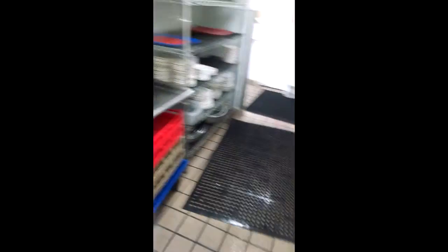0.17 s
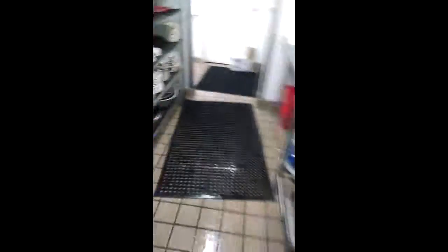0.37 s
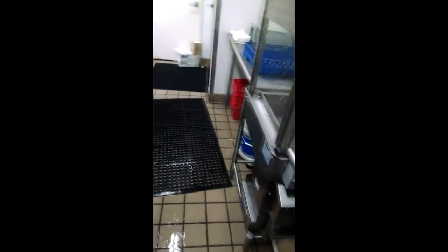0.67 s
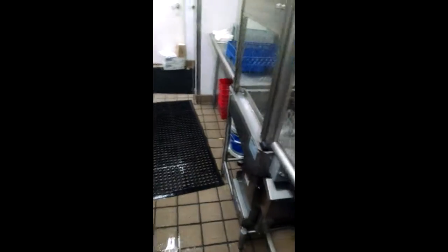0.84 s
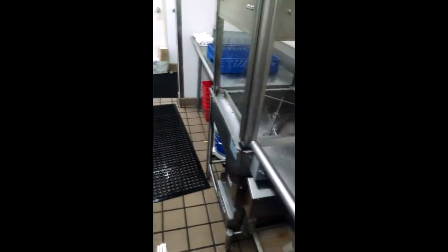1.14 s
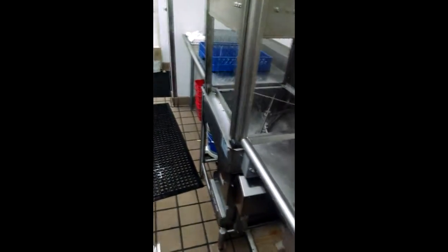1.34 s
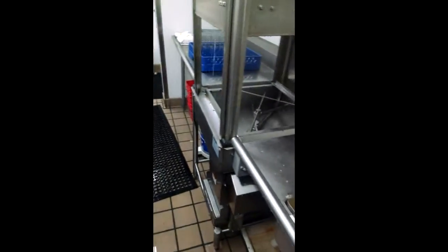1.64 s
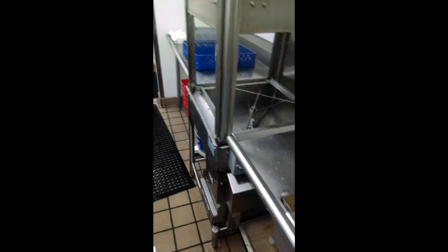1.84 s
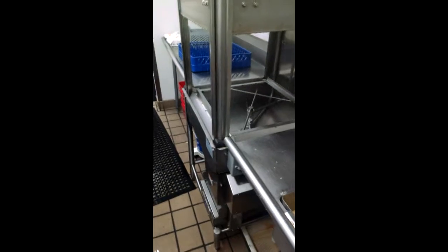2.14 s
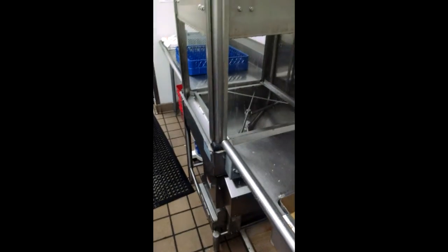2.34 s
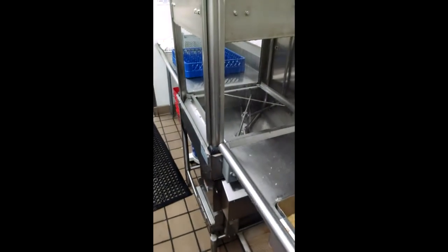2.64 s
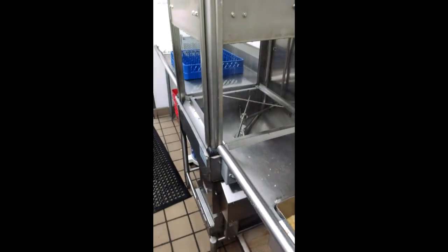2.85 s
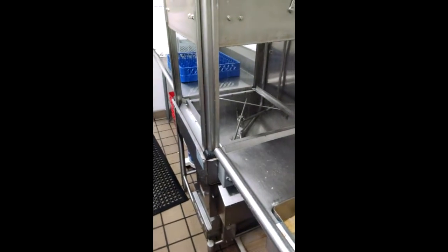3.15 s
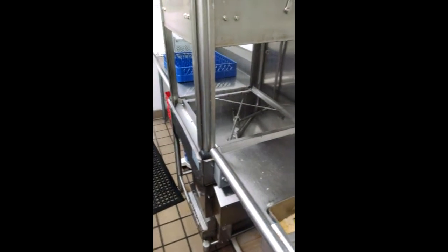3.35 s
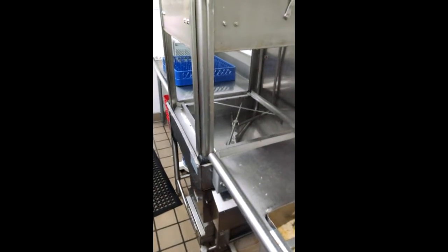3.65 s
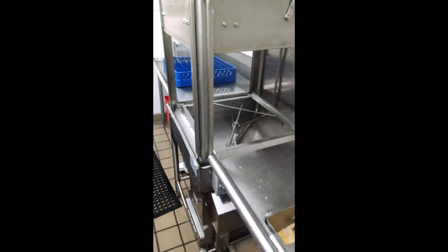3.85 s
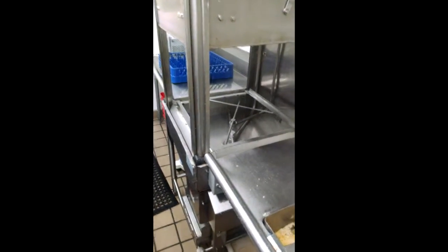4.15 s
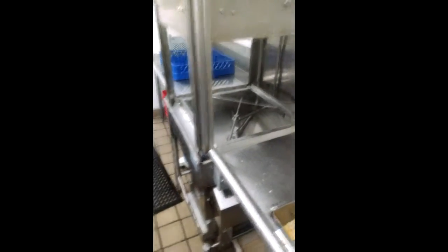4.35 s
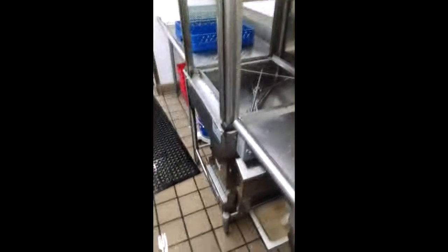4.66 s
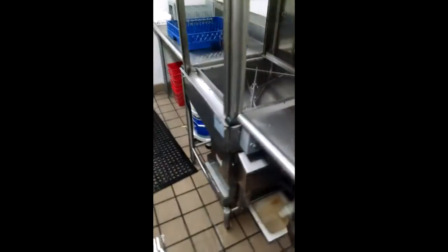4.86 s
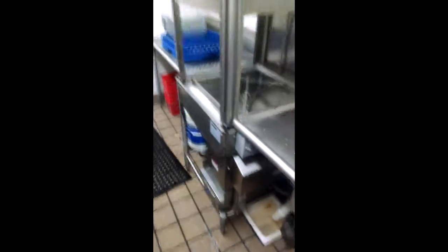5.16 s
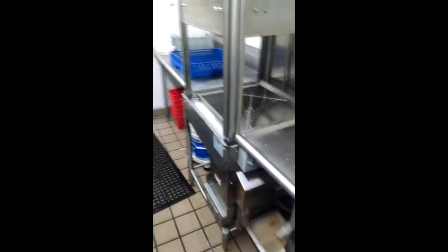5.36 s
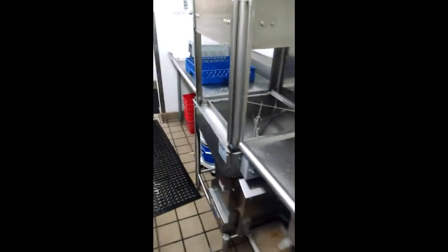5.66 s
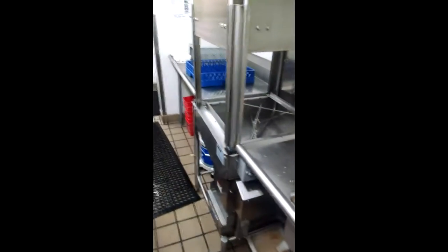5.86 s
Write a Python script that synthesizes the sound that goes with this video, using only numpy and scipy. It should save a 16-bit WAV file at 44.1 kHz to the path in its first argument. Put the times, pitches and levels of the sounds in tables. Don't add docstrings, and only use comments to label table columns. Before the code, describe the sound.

Low motor hum and rumbling water churn run continuously inside steel panels, with dull splashing and fine high hiss on top. The hiss is strongest at the start; the pump grows nearer over two seconds, then stays level. Irregular crisp slaps, drips and crackling ticks hit metal, thinning after halfway. A few knocks ring briefly. Close handheld stereo phone pickup, short tiled-room reflections.

```python
import sys
import numpy as np
from scipy import signal
from scipy.fft import rfft, irfft
from scipy.io import wavfile
from scipy.ndimage import uniform_filter1d

SR = 44100
rng = np.random.default_rng(int(sys.argv[2]) if len(sys.argv) > 2 else 0)


def store_wav(level_fs):
    pcm = np.round(np.clip(np.atleast_2d(level_fs), -1, 1) * 32767)
    wavfile.write(sys.argv[1], SR, pcm.T.astype(np.int16))


def convert_level_to_amplitude(level_db):
    exponent = np.asarray(level_db, float) / 20
    return 10 ** exponent


N = 265261
HZ = np.fft.rfftfreq(N, 1 / SR)

# time_s, tank_level_db, spray_level_db, extra_wall_path_m
PHONE_PATH = [(0.0, -40.5, -31.5, 0.56), (0.28, -40.5, -35, 0.086), (0.56, -37, -34, 0.35),
              (0.7, -36.5, -30, 0.19), (1.0, -33, -34, .3), (1.2, -31, -39.5, 0.18),
              (1.6, -33.5, -43.5, -0.017), (1.7, -33, -39.5, -0.093), (2.14, -27.5, -39.5, -0.1),
              (2.88, -27, -38, 0.26), (3.13, -28, -38.5, -0.06), (3.78, -28.5, -41, -0.19),
              (3.87, -27.5, -46, -0.065), (4.12, -28.5, -42.5, -0.14), (4.7, -28, -44, 0.033),
              (5.25, -28, -41, 0.32), (5.6, -28, -42, 0.32), (6.01, -28, -48.5, 0.39)]
# pitch_hz, level_db (re churn), wander_rate_per_s, wander_db
HUM_LINES = [(79.6, -8, 8.3, -0.5), (119.4, -11.5, 4, 4), (172, -11, 6, 2), (408, -14.5, 9, 3.5),
             (1096, -24.5, 8, 4), (1332, -31, 8, 3.5), (1484, -39, 13, 1)]
# pitch_hz, level_db (re tank), wall_path_turns, upper_port_lead_turns, step_back_gain_db
IMPELLER_TONES = [(234.5, -6, 0.035, 0.33, 2), (350.8, -9.5, 0.1, -0.07, -3), (666.4, -20.5, 0.42, 0.17, 5),
                  (543, -18.5, 0.33, 0.039, -1), (819, -24, 0.18, 0.16, -2)]
STEP_BACK_S, STEP_TAKES_S = 4.9, 0.17
WALL_SHARE = .5
TONE_DB_PER_TANK_DB = 0.14
# freq_hz, density_db (per Hz)
CHURN_SPECTRUM = [(46, 5.5), (65, 3.5), (120, 7), (250, 2), (400, -0.5), (700, -3), (850, -6), (1050, -11),
                  (1400, -14)]
# freq_hz, density_db (per Hz)
PANEL_SPECTRUM = [(900, -12), (1300, -2.5), (1900, 0), (2100, -3), (2300, -11), (3000, -13), (3600, -17)]
PANEL_DB = -10
# freq_hz, density_db (per Hz)
SPLASH_SPECTRUM = [(1800, -8), (2500, -3), (2950, 0), (3400, -.5), (4200, -2), (5500, -3), (8000, -7),
                   (11000, -12)]
SPLASH_DB, SPLASH_DB_PER_JET_DB, SPLASH_DB_PER_TANK_DB = -46.5, 0.59, 0.27
# freq_hz, density_db (per Hz)
JET_SPECTRUM = [(4000, -23), (6500, -9), (8200, -8), (10500, -1), (12500, -2), (14500, 5.5), (15150, -4),
                (15700, 16)]

# start_s, peak_db, low_part_db (re peak)
RACK_SLAPS = [(0.2259, -14, -16.5), (0.309, -17.5, -12), (0.578, -24.5, -7.5), (0.654, -21, -8.5),
              (0.72, -33, -2), (0.826, -69, -36), (0.891, -21, -14), (1.007, -27, -0.5), (1.159, -19, -17),
              (1.243, -17.5, -26), (1.3718, -19.5, -19), (1.4242, -15.5, -13), (1.4394, -27, -31),
              (1.522, -22.5, -10.5), (1.8136, -22.5, -8.5), (2.165, -19, -18), (2.5236, -17.5, -10.5),
              (2.541, -25, -18), (2.66, -19, -29), (2.75, -19, -20), (2.8144, -18, -27), (2.838, -15, -20),
              (2.954, -17.5, -22), (3.144, -22, -47), (3.403, -20.5, -35), (3.705, -22, -27),
              (4.101, -23.5, -11.5), (4.371, -25, -63), (4.566, -25, -7), (5.104, -30, -25)]
SLAP_HZ, SLAP_S = 14200, 0.049
# start_s, peak_db, low_part_db (re peak)
HOOD_SHEETS = [
    (0.072, -28.5, -15.5),
    (1.9096, -19, -18),
    (2.345, -17.5, -17.5),
    (3.018, -18.5, -44),
    (3.269, -21.5, -17),
]
SHEET_HZ, SHEET_S = 11600, 0.046
# start_s, peak_db, low_part_db (re peak)
STEEL_DROPS = [(.1306, -25, -21), (.4579, -27, -8), (1.4295, -13, -18), (1.4395, -23, -22),
               (1.5978, -26, -23), (1.6367, -25.5, -19), (1.726, -23, -14), (1.935, -23, -15),
               (2.0108, -28, -21), (2.2328, -25, -15), (2.4274, -22, -16), (2.5202, -24, -10),
               (2.8055, -25, -20), (2.825, -25, -18), (2.8434, -26, -20), (2.9302, -24, -11),
               (3.2331, -31, -18), (3.6237, -27, -12), (4.0612, -31, -14), (4.2098, -42, -19),
               (4.5446, -25, -9.5), (4.5775, -35, -8), (5.1078, -27, -16), (5.4261, -30, -15),
               (5.5662, -35, -20)]
DROP_HZ, DROP_S = 13400, 0.019
# start_s, peak_db
DROPLET_TICKS = [(0.081, -16), (0.1304, -26), (0.2259, -25), (0.2404, -19), (0.2584, -18), (0.2624, -16),
                 (0.3137, -18), (0.3174, -22), (0.4344, -27), (0.4574, -20), (0.5774, -31), (0.726, -18),
                 (0.8234, -38), (0.8984, -25), (1.0394, -27), (1.1543, -26), (1.243, -13.5), (1.3718, -22),
                 (1.4242, -6), (1.4304, -17), (1.4334, -6), (1.4394, -13), (1.5054, -15), (1.5978, -28),
                 (1.6372, -25), (1.6576, -22), (1.8148, -10.5), (1.9096, -15), (1.9355, -12), (2.0108, -25),
                 (2.1695, -20), (2.2326, -25), (2.3456, -21), (2.427, -25), (2.5197, -14), (2.6574, -15),
                 (2.7501, -16), (2.8055, -24), (2.8115, -22), (2.8244, -20), (2.8434, -18), (2.9294, -22),
                 (2.9584, -25), (3.019, -21), (3.1517, -24), (3.2331, -28), (3.269, -21), (3.6237, -27),
                 (3.707, -20), (4.0612, -29), (4.2098, -31), (4.3704, -16), (4.5444, -35), (4.6927, -30),
                 (5.107, -22), (5.4261, -33), (5.5675, -33), (5.9943, -20)]
TICK_DB, TICK_S, TICK_LOW_HZ = -7.5, .0016, 8060
# start_s, peak_db, pitch_hz, width_hz, t60_s
FRAME_KNOCKS = [(0.869, -36, 1660, 400, 0.56), (1.0768, -38, 890, 695, 0.18), (1.0983, -34, 623, 600, 0.23),
                (1.124, -42, 1070, 696, 0.081), (1.35, -38, 1690, 200, 0.28),
                (3.398, -28, 4580, 1400, 0.18), (3.408, -45, 3700, 900, 0.22),
                (3.695, -29.5, 1560, 350, 0.14), (4.578, -33.5, 7600, 2170, 0.3),
                (4.379, -39, 9500, 2500, 0.18), (4.719, -42, 10400, 2500, 0.2),
                (5.93, -32.5, 1730, 497, 0.28)]
STRIKE_DB = 1
# pitch_hz, level_db, t60_s
RACK_MODES = [(409, -7, .1), (560, -6, 0.077), (657, 0, 0.07), (877, 1, 0.065), (1040, -2, 0.084),
              (1170, -1, 0.055), (1810, -13, 0.13)]
# start_s, level_db
RACK_HITS = [
    (1.0765, -27),
    (1.0985, -34),
    (1.121, -35),
]
# pitch_hz, level_db, t60_s
RAIL_MODES = [(3849, -19, .15), (4230, -7, 0.035), (4307, -9, 0.14), (4650, -7, .08), (4560, -2.5, .35),
              (4845, 4, .24), (5150, -4, .06), (5500, -12, .15)]
# start_s, level_db
RAIL_HITS = [
    (3.398, -41),
    (3.412, -49),
]
CONTACT_S = .001
# time_s, pitch_hz
WHISTLE_GLIDE = [
    (2.045, 15200),
    (2.07, 14750),
    (2.095, 14700),
    (2.13, 15450),
]
WHISTLE_DB = -36
ROOM_T60_S, ROOM_DB = .25, -8

# freq_hz, level_db
UPPER_SHADING = [(30, 0), (100, -1.5), (250, -1.5), (1000, -3.5), (5000, 1.5), (8000, -8.5), (11000, -9.5),
                 (15000, -8)]
# freq_hz, share_db
UNLIKE_SHARE = [(30, -37), (60, -43), (125, -27), (250, -12), (420, -3.5), (700, -1.02), (1500, 0.27)]
UPPER_LAG_SAMPLES, PORT_LAG_SAMPLES = 5.0, 17.22
# freq_hz, level_db (re direct)
SCATTER_SPECTRUM = [(30, -4), (150, -9), (1300, -12), (2500, -11), (5000, -4), (9500, -1.5), (11500, -8),
                    (15600, -10)]
# freq_hz, level_db
RIGHT_OVER_LEFT = [(300, 2), (560, -2), (1000, -0.5), (1500, 1.5), (2000, 2), (2500, 5), (8000, -0.5),
                   (15000, 1.5)]
TOP_HZ = 15600
# freq_hz, gap_db
GATE_GAP = [(1500, -30), (2250, -3), (2900, -10), (3800, -5), (4900, -4.5), (7900, -4), (9500, -10.5),
            (15000, -13), (15400, -6)]
# freq_hz, shift_db_per_db
GATE_PULL = [(2000, .18), (5000, .13), (6500, .05), (8000, -.1), (15000, -.2)]
GATE_EDGES = np.r_[0:96:8, np.geomspace(96, 320, 13)[:-1].astype(int), 320:384:32, 384:704:10, 704:1025:32]
GATE_WANDER_DB, GATE_EARLY_SAMPLES = 3.1, 592
GATE_FRAME = dict(window=("tukey", .6), nperseg=1472, noverlap=448, nfft=2048)


def shape(table):
    hz, value = np.transpose(table)
    return np.interp(np.log(HZ + 1), np.log(hz), value)


def colour(x, table):
    below = np.minimum(HZ / table[0][0], 1) ** 2
    above = np.minimum(table[-1][0] / (HZ + 1), 1) ** 2
    return irfft(rfft(x) * convert_level_to_amplitude(shape(table)) * below * above, N)


def delay(samples):
    return np.exp(-2j * np.pi * HZ * samples / SR)


def unit(x, lo_hz, hi_hz):
    band = np.abs(rfft(x[1]))[(HZ > lo_hz) & (HZ < hi_hz)]
    return x * N / np.sqrt(2 * np.sum(band ** 2))


def walk(rate_per_s):
    hold = int(SR / rate_per_s)
    levels = np.repeat(rng.standard_normal(N // hold + 1), hold)
    slewed = uniform_filter1d(uniform_filter1d(levels, hold), hold)
    return 1.39 * slewed[:N]


def hum():
    t = np.arange(N) / SR
    out = np.zeros((2, N))
    for hz, db, rate_per_s, wander_db in HUM_LINES:
        for port in out:
            phase = 2 * np.pi * (hz * t + rng.random()) + 0.21 * wander_db * walk(rate_per_s)
            level = convert_level_to_amplitude(db + wander_db * walk(rate_per_s))
            port += level * np.sqrt(2) * np.sin(phase)
    return out


def impeller(path_m):
    t = np.arange(N) / SR
    out = np.zeros((2, N))
    stepped = (1 + np.tanh((t - STEP_BACK_S) / STEP_TAKES_S)) / 2
    for hz, db, turns, lead, back_db in IMPELLER_TONES:
        phase = 2 * np.pi * (hz * t + np.array([[lead], [0]])) + 0.62 * walk(3.08)
        echo_turns = turns + hz * path_m / 343
        standing = np.abs(1 + WALL_SHARE * np.exp(2j * np.pi * echo_turns))
        level = convert_level_to_amplitude(db + back_db * stepped + 1.84 * walk(5.94))
        out += level * standing * np.sqrt(2) * np.sin(phase)
    return out


def water(table, grain_db, grains_per_s, flicker_db, flicker_per_s):
    drops = (rng.random(N) < grains_per_s / SR) * convert_level_to_amplitude(grain_db * rng.exponential(size=N))
    patter = signal.lfilter([1], [1, -.97], drops)
    strength = np.sqrt(1 + patter ** 2) * convert_level_to_amplitude(flicker_db * walk(flicker_per_s))
    return colour(rng.standard_normal((2, N)) * strength, table)


def slaps(table, hz, length_s):
    out = np.zeros((2, N))
    age = np.arange(int(.2 * SR)) / SR
    chances = rng.random((len(table), 6))
    low_band = signal.butter(2, [4600, 8000], "band", fs=SR, output="sos")
    high_band = signal.butter(3, [0.89 * hz, 1.43 * hz], "band", fs=SR, output="sos")
    for (s, db, low_db), chance in zip(table, chances):
        body = .5 * np.exp(-(age / length_s) ** 1.3)
        lates_s = np.r_[0, chance[:3]] * length_s
        sizes = np.r_[2.2, chance[3:]]
        for late_s, size in zip(lates_s, sizes):
            body = body + 0.093 * size * (age >= late_s) * np.exp(-np.abs(age - late_s) / 0.0021)
        sheet = body * rng.standard_normal((2, len(age)))
        i = int(s * SR)
        out[:, i:i + len(age)] += convert_level_to_amplitude(db + 1.5) * signal.sosfilt(high_band, sheet)
        out[:, i:i + len(age)] += convert_level_to_amplitude(db + low_db + 6.0) * signal.sosfilt(low_band, sheet)
    return out


def ticks():
    age = np.arange(int(.012 * SR)) / SR
    out = np.zeros((2, N + len(age)))
    cracks = rng.standard_normal((len(DROPLET_TICKS), 2, len(age)))
    for (s, db), crack in zip(DROPLET_TICKS, cracks):
        i = int(s * SR)
        out[:, i:i + len(age)] += convert_level_to_amplitude(db + TICK_DB) * crack * np.exp(-age / TICK_S)
    high_pass = signal.butter(2, TICK_LOW_HZ, "high", fs=SR, output="sos")
    return signal.sosfilt(high_pass, out)[:, :N]


def knocks():
    out = np.zeros((2, N))
    for s, db, hz, width_hz, t60_s in FRAME_KNOCKS:
        i = int(s * SR)
        age = np.arange(min(int(.3 * SR), N - i)) / SR
        band = signal.butter(2, [hz - width_hz / 2, hz + width_hz / 2], "band", fs=SR, output="sos")
        ring = signal.sosfilt(band, rng.standard_normal((2, len(age))))
        ring = ring / ring.std() * 1000. ** (-age / t60_s) * np.minimum(age / 0.0019, 1)
        strike = signal.sosfilt(band, 1. * (age == 0))
        strike = convert_level_to_amplitude(STRIKE_DB) * strike / np.abs(strike).max()
        out[:, i:i + len(age)] += convert_level_to_amplitude(db) * (ring + strike)
    return out


def struck(modes, blows):
    out = np.zeros((2, N))
    age = np.arange(int(.3 * SR)) / SR
    for s, db in blows:
        i = int(s * SR)
        for hz, mode_db, t60_s in modes:
            decay = 1000. ** (-age / t60_s) * np.minimum(age / CONTACT_S, 1)
            ring = np.sin(2 * np.pi * hz * age) * decay
            level = convert_level_to_amplitude(db + mode_db + 2 * rng.standard_normal((2, 1)))
            out[:, i:i + len(age)] += level * ring
    return out


def whistle():
    t = np.arange(N) / SR
    s, hz = np.transpose(WHISTLE_GLIDE)
    swell = np.sin(np.pi * np.clip((t - s[0]) / (s[-1] - s[0]), 0, 1)) ** .5
    pitch_hz = uniform_filter1d(np.interp(t, s, hz), size=600)
    return convert_level_to_amplitude(WHISTLE_DB) * swell * np.sin(2 * np.pi * np.cumsum(pitch_hz) / SR)


def tail(t60_s):
    t = np.arange(int(.5 * SR)) / SR
    h = rng.standard_normal((2, len(t))) * 1000. ** (-t / t60_s)
    return h / np.sqrt(np.sum(h ** 2, axis=1, keepdims=True))


def ports(pair):
    own, lower = rfft(pair)
    unlike = np.clip(convert_level_to_amplitude(shape(UNLIKE_SHARE)), 0, 1)
    shared = np.sqrt(1 - unlike ** 2) * delay(UPPER_LAG_SAMPLES) * lower
    upper = convert_level_to_amplitude(shape(UPPER_SHADING)) * (shared + unlike * own)
    return irfft(np.array([upper, lower]), N)


def scatter(sides):
    frames = signal.stft(sides, SR, nperseg=512)[2]
    turned = frames * np.exp(2j * np.pi * rng.random(frames.shape))
    scattered = signal.istft(turned, SR, nperseg=512)[1][:, :N]
    return colour(np.sqrt(2) * scattered, SCATTER_SPECTRUM)


def sum_difference_gate(sides):
    sides = np.pad(sides, ((0, 0), (GATE_EARLY_SAMPLES, 0)))
    pair = np.array([sides[0] + sides[1], sides[0] - sides[1]]) / 2
    hz, _, frames = signal.stft(pair, SR, **GATE_FRAME)
    band = np.searchsorted(GATE_EDGES, np.arange(len(hz)), "right") - 1
    starts = np.flatnonzero(np.diff(band, prepend=-1))
    power = np.add.reduceat(np.abs(frames) ** 2, starts, axis=1)
    wander = uniform_filter1d(rng.standard_normal(power.shape[1:]), size=2, axis=0)
    wander = uniform_filter1d(wander, size=3, axis=1)
    gap_db = np.interp(hz[starts], *np.transpose(GATE_GAP))[:, None]
    gap_db = gap_db + GATE_WANDER_DB * wander / wander.std()
    total = np.sum(np.abs(frames) ** 2, axis=0) + 1e-18
    bright_db = 10 * np.log10(total[hz > 8000].sum(0) / total[hz < 2000].sum(0))
    bright_db = uniform_filter1d(bright_db, size=21)
    pull = np.interp(hz[starts], *np.transpose(GATE_PULL))[:, None]
    gap_db = gap_db + pull * (bright_db - bright_db.mean())
    kept = power > convert_level_to_amplitude(2 * np.minimum(gap_db, -1)) * power[::-1]
    gated = signal.istft(frames * kept[:, band], SR, **GATE_FRAME)[1]
    mid, side = gated[:, GATE_EARLY_SAMPLES:GATE_EARLY_SAMPLES + N]
    return np.array([mid + side, mid - side])


def scene():
    s, *columns = np.transpose(PHONE_PATH)
    tank_db, jet_db, path_m = (np.interp(np.arange(N) / SR, s, c) for c in columns)
    splash_db = SPLASH_DB + SPLASH_DB_PER_JET_DB * (jet_db - jet_db.mean())
    splash_db = splash_db + SPLASH_DB_PER_TANK_DB * (tank_db - tank_db.mean())
    tone_db = TONE_DB_PER_TANK_DB * (tank_db - tank_db.max())

    tank = unit(water(CHURN_SPECTRUM, 0.65, 300, 0.76, 6.0), 188, 870) + hum()
    panels = unit(water(PANEL_SPECTRUM, 0.15, 600, 0.34, 8.1), 1270, 2250)
    splash = unit(water(SPLASH_SPECTRUM, 0.088, 800, 1.2, 7), 2960, 6900)
    jets = unit(water(JET_SPECTRUM, 0.096, 700, 1.5, 4.51), 11500, 14880)
    machine = tank + convert_level_to_amplitude(PANEL_DB) * panels + convert_level_to_amplitude(tone_db) * impeller(path_m)
    steady = convert_level_to_amplitude(tank_db) * machine + convert_level_to_amplitude(splash_db) * splash + convert_level_to_amplitude(jet_db) * jets

    hits = slaps(RACK_SLAPS, SLAP_HZ, SLAP_S) + slaps(HOOD_SHEETS, SHEET_HZ, SHEET_S)
    hits = hits + slaps(STEEL_DROPS, DROP_HZ, DROP_S) + ticks() + knocks()
    hits = hits + struck(RACK_MODES, RACK_HITS) + struck(RAIL_MODES, RAIL_HITS) + whistle()
    echoes = signal.fftconvolve(hits, tail(ROOM_T60_S), axes=1)[:, :N]
    return ports(steady + hits + convert_level_to_amplitude(ROOM_DB) * echoes)


def low_pass(x):
    return signal.sosfilt(signal.butter(12, 16030, fs=SR, output="sos"), x)


def record(dry):
    sides = irfft(rfft(dry) - delay(PORT_LAG_SAMPLES) * rfft(dry[::-1]), N)
    balance = convert_level_to_amplitude(shape(RIGHT_OVER_LEFT) * np.array([[-.5], [.5]]))
    sides = irfft(rfft(sides + scatter(sides)) * (HZ < TOP_HZ) * balance, N)
    return low_pass(sum_difference_gate(sides))


dry = scene()
out = record(dry)
store_wav(out)
```